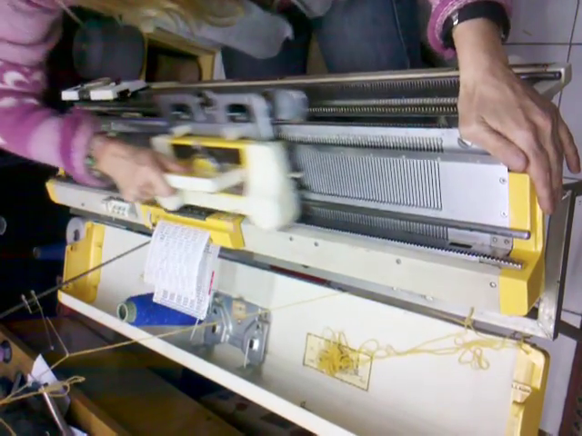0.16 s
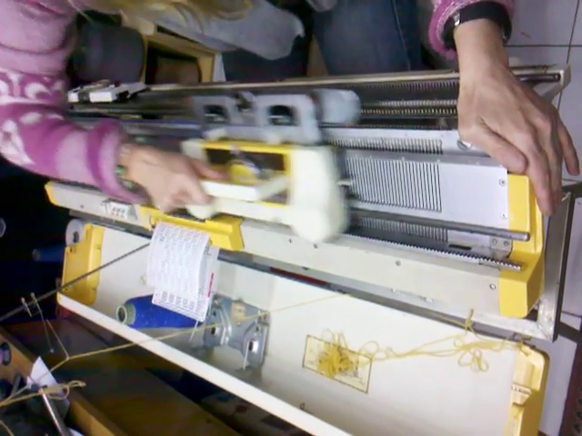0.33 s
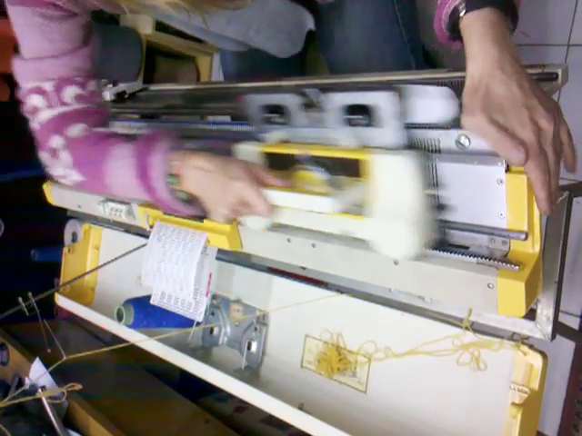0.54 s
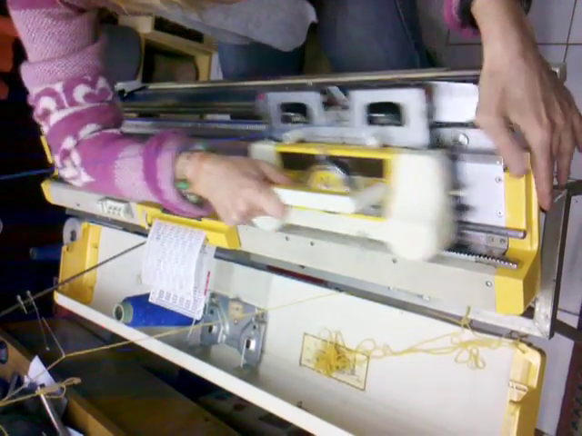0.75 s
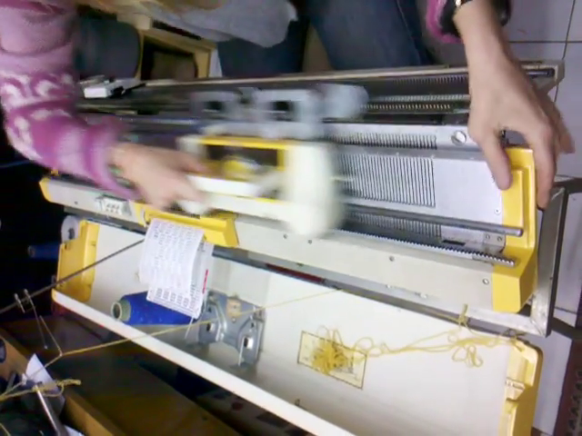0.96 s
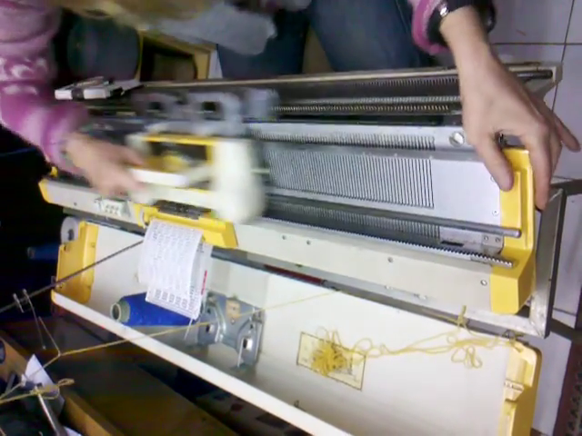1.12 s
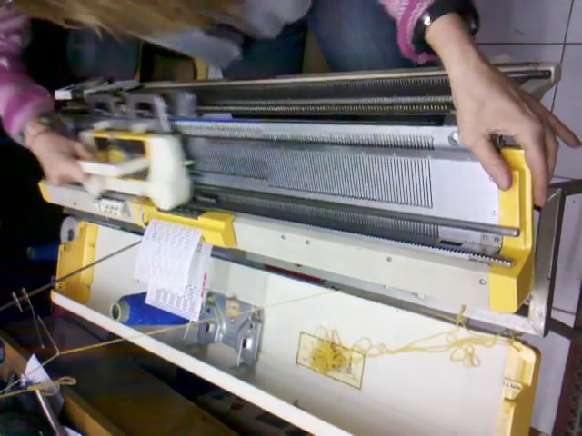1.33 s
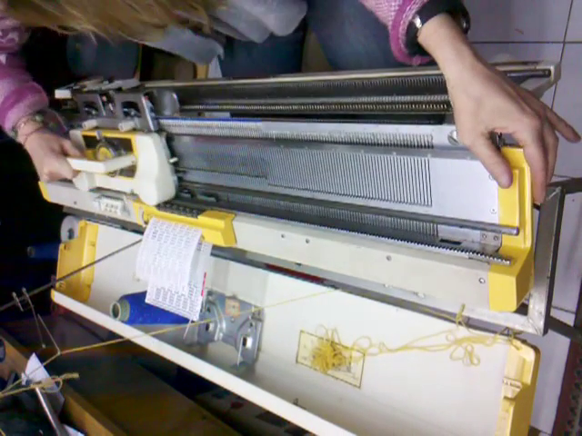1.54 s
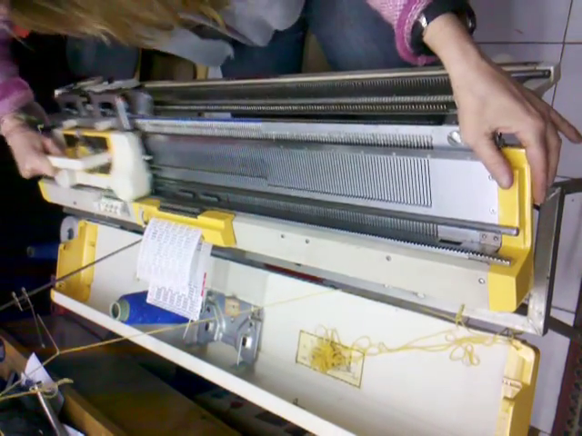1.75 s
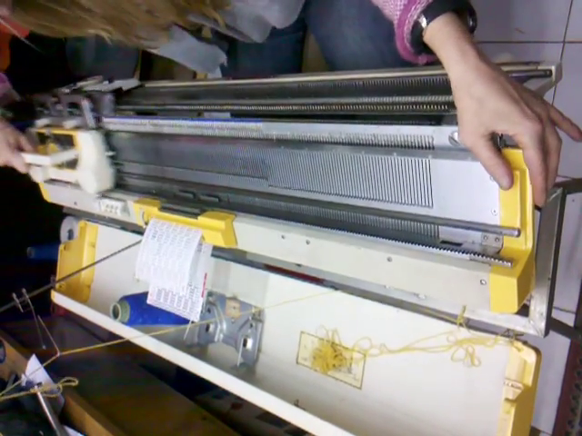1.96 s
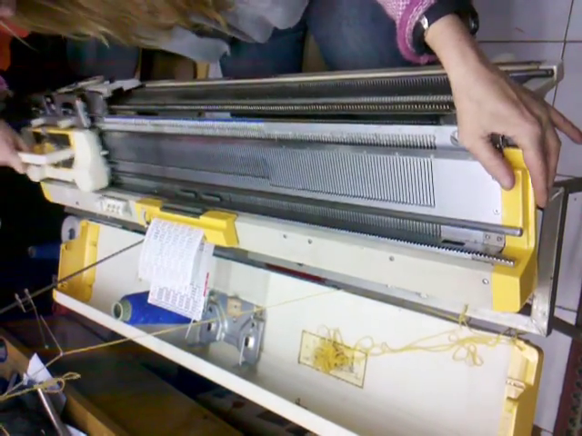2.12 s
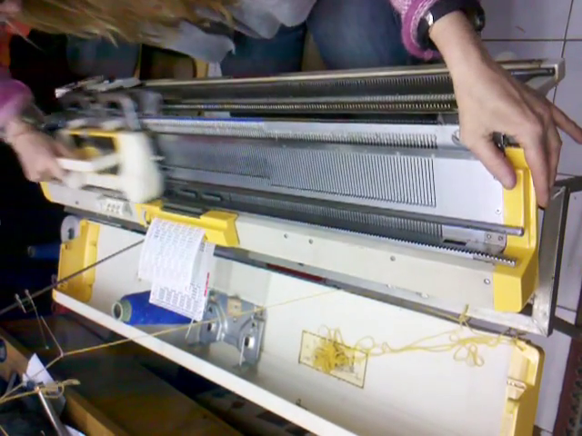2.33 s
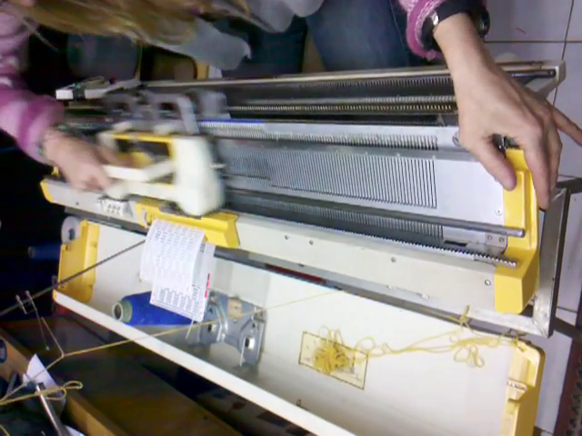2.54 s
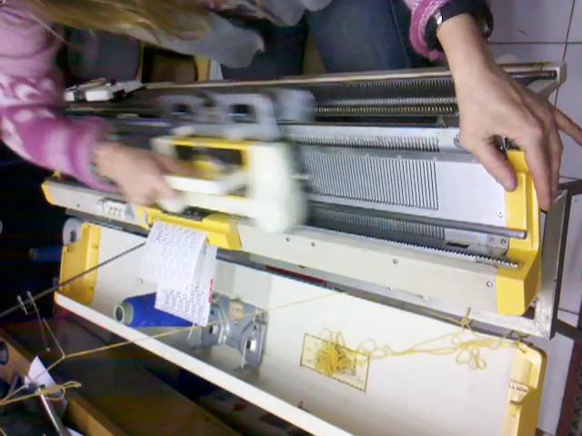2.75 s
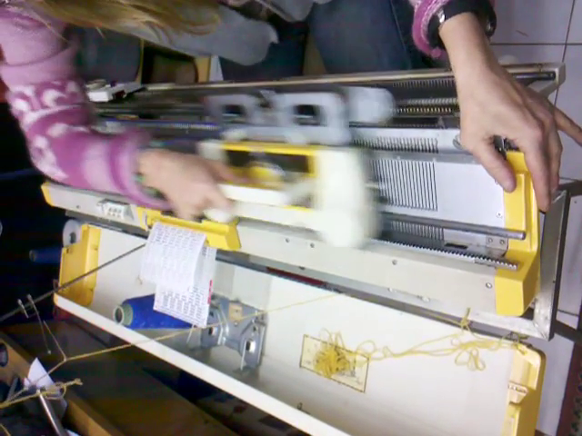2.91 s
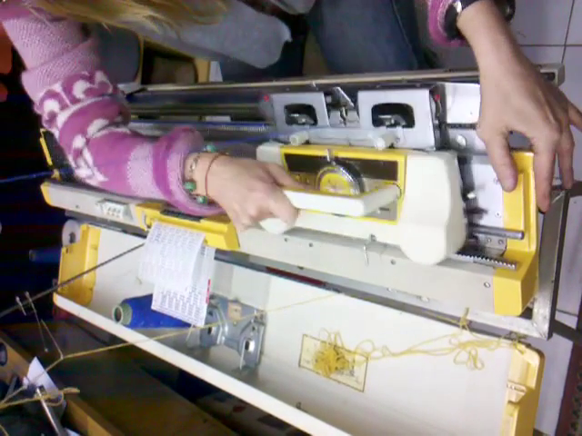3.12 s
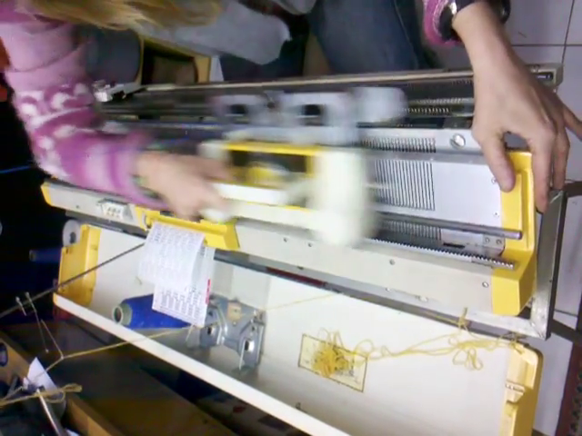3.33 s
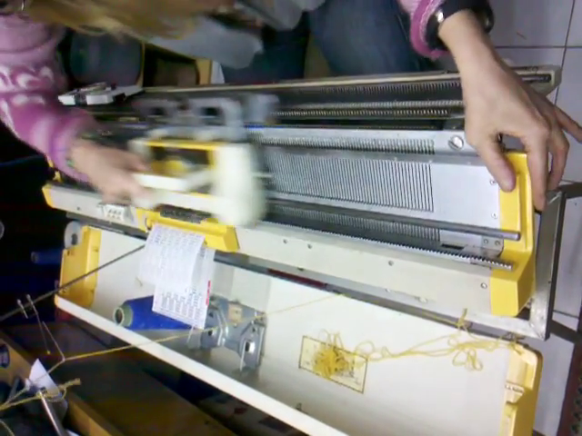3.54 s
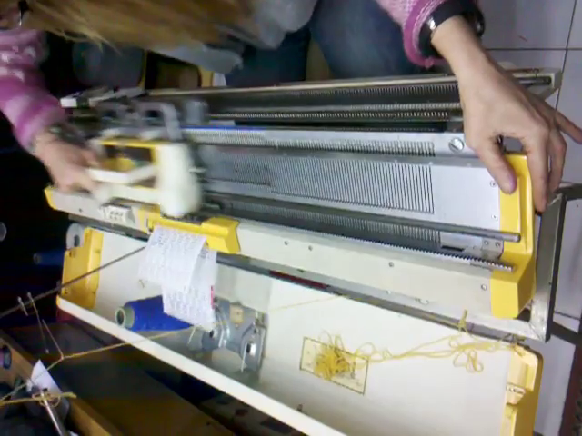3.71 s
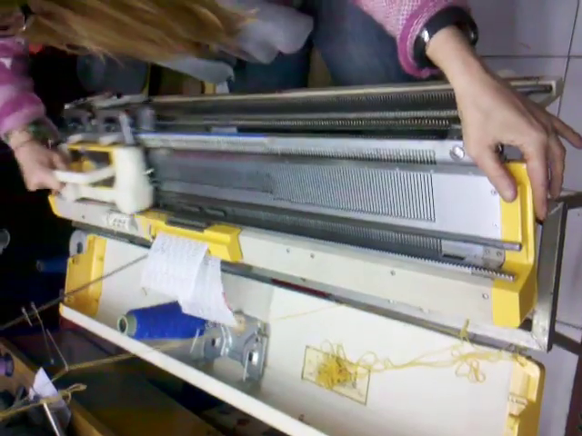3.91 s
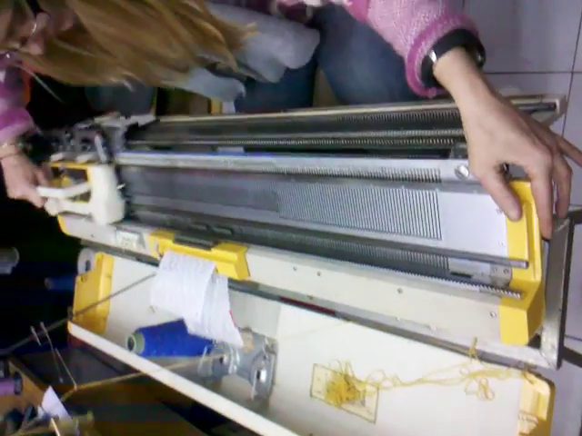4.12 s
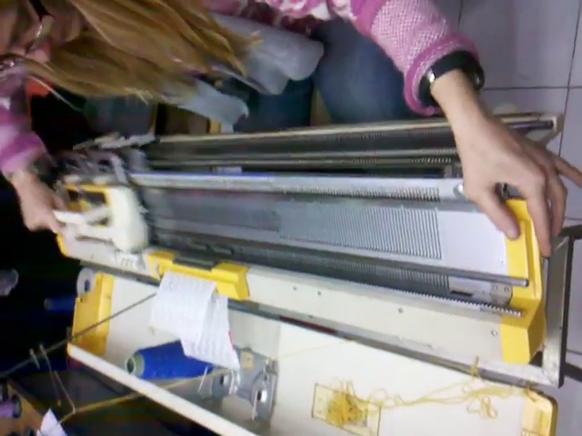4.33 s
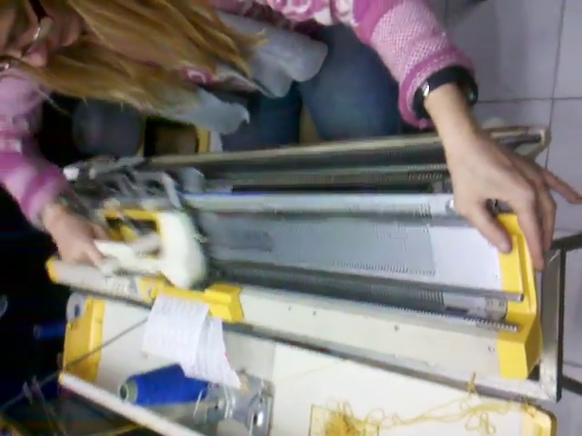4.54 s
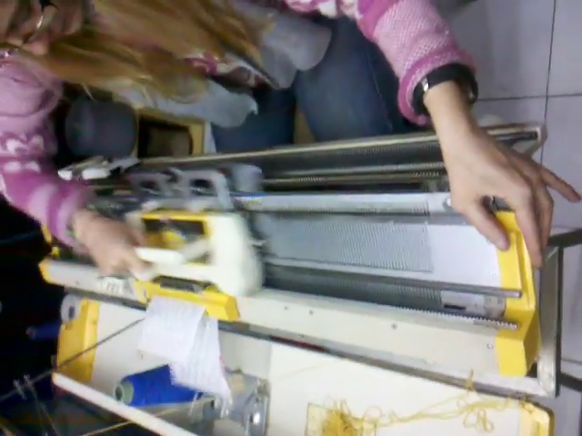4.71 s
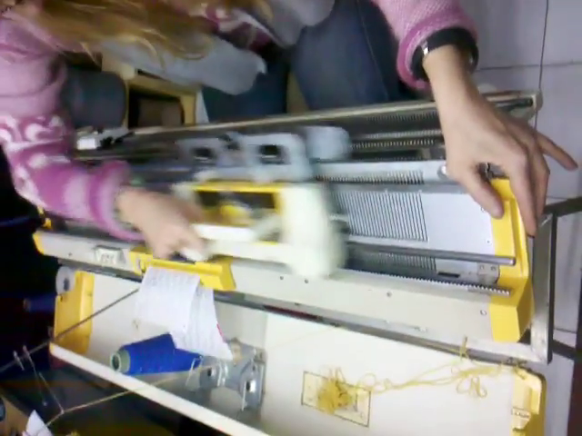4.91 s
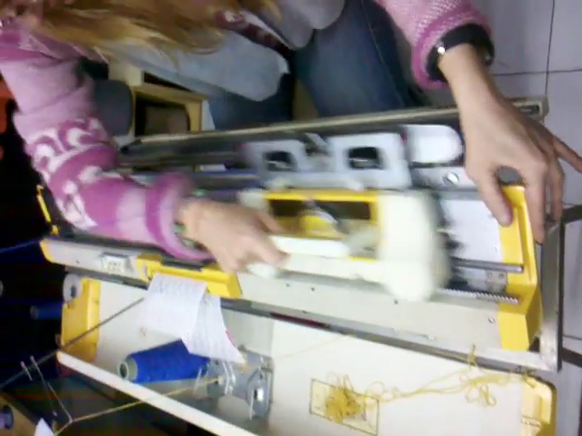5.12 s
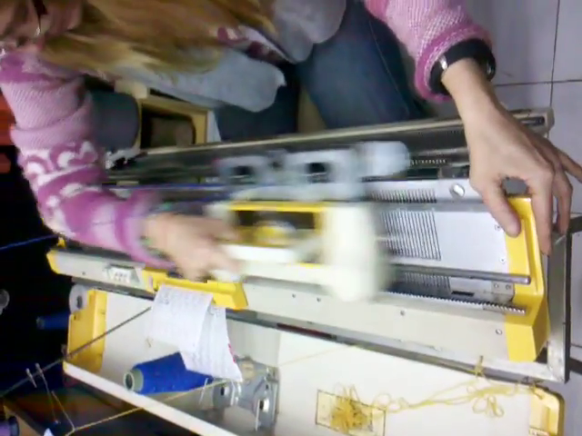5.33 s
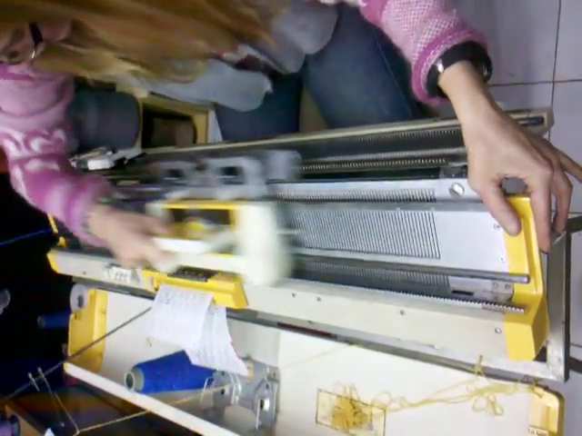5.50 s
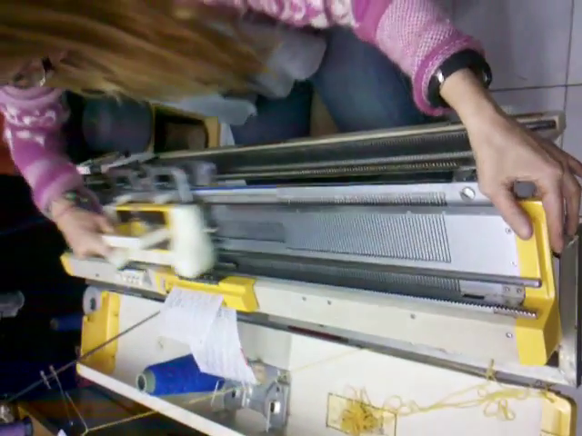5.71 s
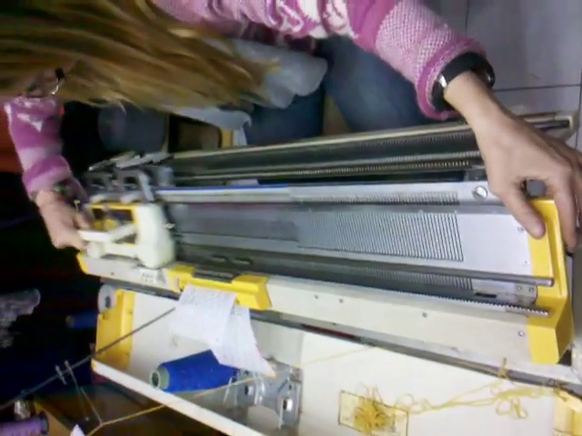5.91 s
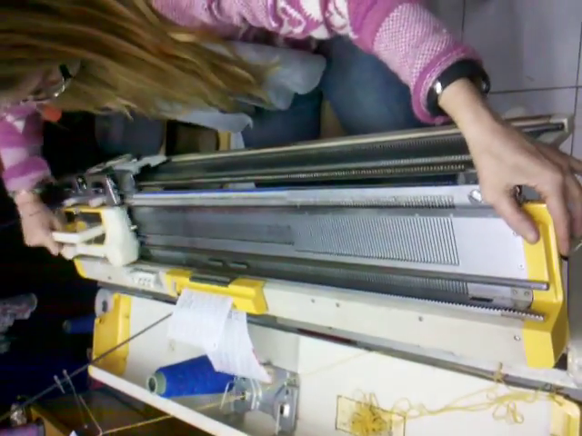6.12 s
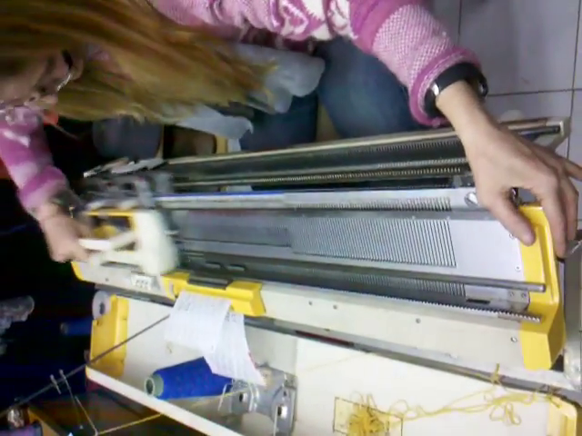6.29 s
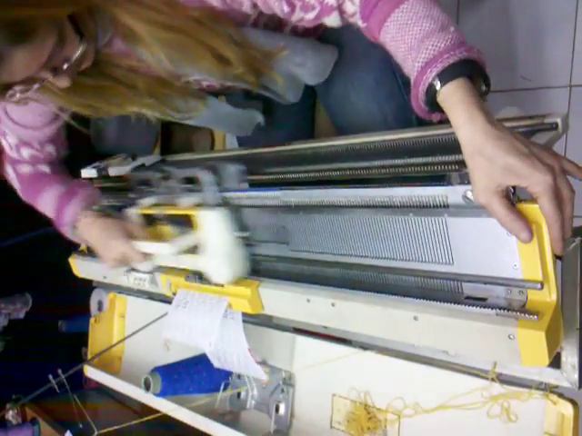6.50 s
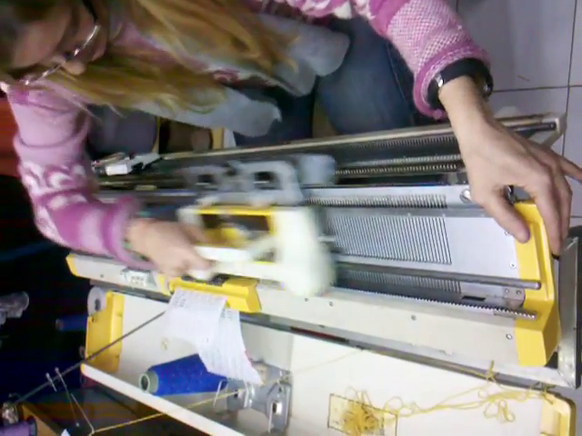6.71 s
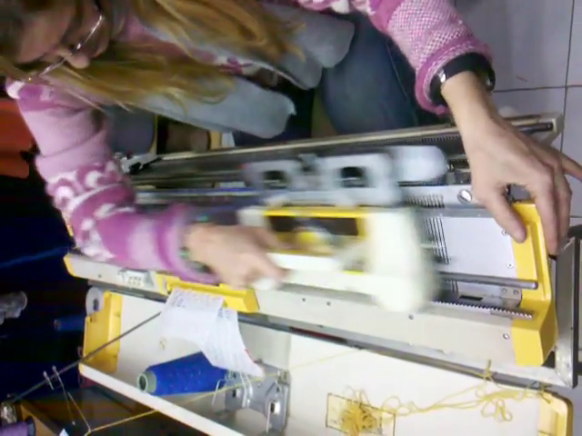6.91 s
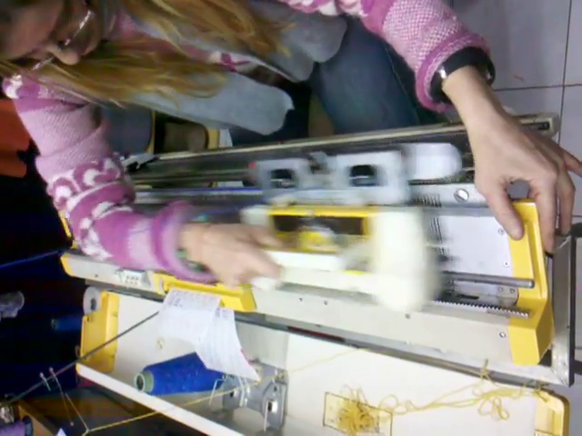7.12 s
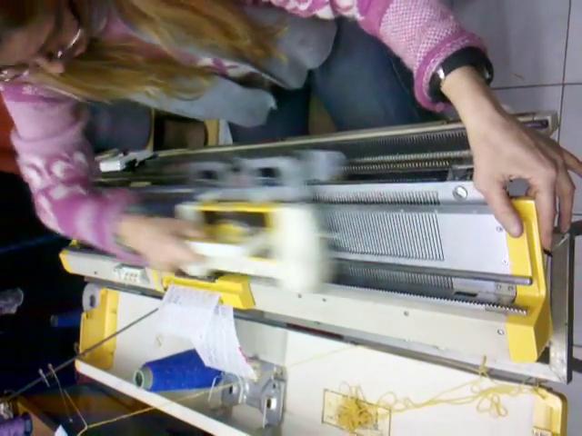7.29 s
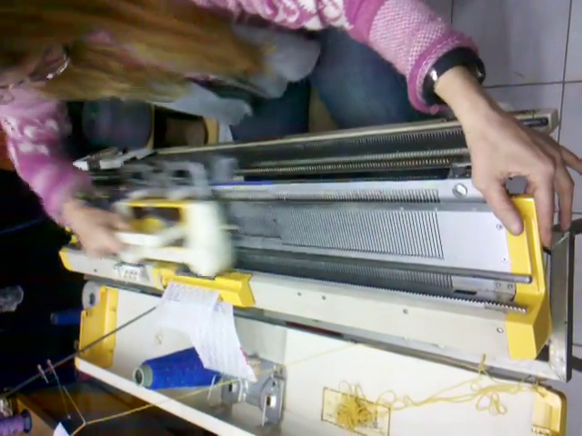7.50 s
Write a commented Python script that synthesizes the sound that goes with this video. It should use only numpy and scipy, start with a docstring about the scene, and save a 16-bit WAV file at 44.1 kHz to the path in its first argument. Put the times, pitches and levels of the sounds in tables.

```python
"""A small room, where a knitting machine's carriage is pushed to and fro by hand, close to two microphone ports.
Juddering sliders ring the case and toothed-wheel hums glide: the carriage rumbles and whirrs on its rail.
Cams scrape along the bed and set steel needles and latches ticking, as bursts of noise through resonances.
Levers clack and a sprung pawl snaps, as brief noise pulses; dull decaying blows bump the carriage on its rail."""
import sys
import numpy as np
from scipy import signal
from scipy.fft import rfft, irfft, next_fast_len
from scipy.io import wavfile
from scipy.ndimage import uniform_filter1d, map_coordinates

SR = 44100
rng = np.random.default_rng(int(sys.argv[2]) if len(sys.argv) > 2 else 0)


def unload_wav(signal):
    """Save mono or channel-first audio to the path in sys.argv[1] as 16-bit WAV at rate SR, clipped to [-1, 1]."""
    wavfile.write(
        sys.argv[1],
        SR,
        np.round(np.clip(np.atleast_2d(signal).T, -1, 1) * 32767).astype(np.int16),
    )


N = 332955  # length [samples]

# All levels are relative: the mix, the ports and the band limits still act on them.
# Colour of the still room: (frequency [Hz], density [dB per Hz])
STILL_SPECTRUM = [(25, -8), (55, -16), (90, -22), (160, -1), (550, -0.5), (1100, -27), (3000, -8),
                  (6000, -26), (14000, -33)]
# Colour of the deep rumble: (frequency [Hz], density [dB per Hz])
DEEP_SPECTRUM = [(25, -2.5), (55, 0), (90, -6.5), (150, -8), (220, -14), (330, -52)]
# Course of the deep rumble: (time [s], level [dB])
DEEP_LEVEL = [(0, -46), (1.04, -48), (1.12, -61), (7.55, -70)]
DEEP_SWING_DB = 5.5

# Shoves of the hand: (start [s], end [s], rumble level [dB], tiring over the shove [dB],
# time to get going [s], time to stop [s])
SHOVES = [(-.196, 0.742, -38, 1.5, 0.077, 0.063), (0.777, 1.558, -27.5, 18.5, 0.21, 0.29),
          (1.432, 2.133, -47.5, -13.5, 0.62, 0.23), (2.158, 3.168, -38.5, 0, 0.095, 0.037),
          (3.222, 4.228, -32.5, 16, 0.14, 0.035), (4.278, 5.259, -35.5, 6.5, 0.11, 0.066),
          (5.261, 6.185, -33, 13, 0.12, 0.054), (6.207, 7.097, -36, 4.5, 0.084, 0.05),
          (7.111, 7.994, -33.5, 8.5, 0.15, 0.09)]
# Cams running through needles at work: (meet [s], leave [s], rattle level [dB], swell time [s], fading [dB/s])
NEEDLE_PASSES = [(-0.01, 0.491, -20.5, 0.043, 10), (0.936, 1.378, -18.5, 0.11, 19),
                 (1.55, 1.69, -40, 0.13, 0), (1.698, 1.847, -28.5, 0.099, 5),
                 (2.303, 2.964, -20, 0.066, 3.5), (3.379, 4, -17.5, 0.1, 20.5),
                 (4.407, 5.017, -19, 0.076, 7), (5.393, 5.985, -18, 0.093, 16.5),
                 (6.316, 6.884, -18.5, 0.04, 7), (7.254, 7.9, -17, 0.1, 25)]
REST_DB, SHIVER_DB = -63.5, -58.5  # floors of the rail's rumble and of the needles' rattle
MEET_DB_PER_S, LEAVE_DB_PER_S = 850, 213  # slopes of the rattle's onset and release
SWELL_DB = 6  # growth of the rattle after its onset
IDLE_DB, IDLE_POWER = -44, 1.2  # idle needles at top speed; exponent of the speed
SPEED_DB = 6.5  # working needles at top speed over those at a crawl

# Resonances of the bed and its case: (frequency [Hz], width [Hz], level [dB])
CASE_MODES = [(196, 46, -8.5), (352, 15.5, -2.5), (428.5, 24.4, -2), (506.4, 20, -11), (533.5, 18, -5.5),
              (628, 42, 2), (675, 24, -2.5), (717.4, 24, 4), (799, 27, -2), (839, 30, -3), (1081, 22, 0.5)]
# Resonances of the lever and the carriage's frame: (frequency [Hz], width [Hz], level [dB])
FRAME_MODES = [(715.6, 15.3, 4.5), (1280, 68, 6.5), (1398, 43, 6.5), (1461, 63, 3.5), (1600, 27, 6),
               (1700, 59, 3.5), (1926, 117, 3.5), (2825, 284, 2.5), (3090, 72, 9), (3370, 34, 14.5),
               (3260, 87, -3.5), (3820, 96, 3.5), (4130, 40, -2.5)]
# Colour of the rail's rumble: (frequency [Hz], density [dB per Hz])
RAIL_SPECTRUM = [(30, -52), (60, -38), (85, -77), (170, -7.5), (280, -15.5), (360, -4.5), (650, -2.5),
                 (950, -2), (1300, -3), (2000, -10.5), (3000, -6.5), (5500, -26), (14000, -14.5)]
# Colour of the scraping cams: (frequency [Hz], density [dB per Hz])
CAM_SPECTRUM = [(300, -47), (800, -2.5), (1350, 4.5), (1800, -1.5), (2300, 2), (2800, 6), (3400, -14.5),
                (4150, 3), (4900, -6), (5600, -33), (7200, -1), (14000, -28)]
# Colour of needles and latches: (frequency [Hz], density [dB per Hz])
NEEDLE_SPECTRUM = [(800, -20.5), (2500, -21.5), (4000, -9), (5800, -13.5), (7100, -7), (8500, -4),
                   (9500, 1.5), (10400, 3.5), (11100, 2.5), (12000, 6), (13000, 3.5), (14000, -1.5)]
NEEDLE_SHARE = 0.58  # how far the cams follow the needles rather than the push (0-1)
CRAWL_DB, CRAWL_HZ = -4.5, 1060  # treble loss at a standstill, and the pitch above which it acts
BRIGHT_SPEED = 0.28  # speed (0-1) that opens up the treble
LOOSE_DB = -33  # single latches under a full rattle

# Knocks over levers and clicks in the carriage's play: (time [s], level [dB], swelling and dying time [s])
CLACKS = [(0.069, -23, 0.033), (0.452, -25.5, 0.013), (0.628, -33, .005), (0.766, -46, 0.0071),
          (0.885, -39, 0.0094), (1.001, -18.5, 0.0049), (1.211, -18, 0.032), (1.583, -43.5, .008),
          (1.929, -26.5, 0.006), (2.036, -51, 0.0021), (2.228, -40, .006), (2.678, -20, 0.025),
          (2.823, -32, 0.0027), (2.953, -21.5, 0.0039), (3.634, -19.5, 0.017), (4.06, -27, 0.0062),
          (4.168, -46, .008), (4.737, -21.5, 0.027), (5.009, -22, 0.0056), (5.19, -53, 0.0021),
          (5.225, -51, 0.0027), (5.248, -52, .003), (5.636, -17, 0.013), (5.871, -24, 0.0041),
          (6.033, -29, 0.011), (6.116, -39, 0.0034), (6.624, -19.5, 0.018), (6.881, -20, 0.0034),
          (7.135, -46, .005), (7.486, -18, 0.013)]
# Colour of the clatter: (frequency [Hz], density [dB per Hz])
KNOCK_SPECTRUM = [(200, -45), (700, 9.5), (1500, -6), (4000, 12.5), (5700, 2), (8000, 11), (11000, 19.5),
                  (14000, -8)]
# Wheel teeth meeting a case resonance: (time [s], pitch [Hz], level [dB], half length [s], glide [Hz/s])
HUMS = [(0.205, 192, -52, 0.16, 2), (.68, 188, -55, 0.12, -79.5), (.905, 326, -40, .03, 652),
        (.985, 350, -47, 0.052, -1), (0.992, 188, -50, .07, 192), (1.161, 410, -48, .04, 2),
        (1.87, 210, -54.5, 0.19, 0), (2.348, 628, -40.5, 0.048, -2), (2.36, 198, -58, .08, -150),
        (3.06, 343, -45.5, 0.043, -250), (3.334, 338, -44.5, 0.031, 700), (3.453, 424, -44, .045, 49),
        (3.549, 402, -48.5, 0.039, -400), (4.11, 325, -55, .039, -300), (5.461, 429, -37, 0.055, 8),
        (5.648, 352, -50.5, .035, -100), (6.073, 353, -41, 0.03, -200), (6.965, 341, -43, 0.034, -400),
        (7.217, 350, -49, .04, 404)]
WAVER, HUM_DB = 0.011, 2.8  # pitch unsteadiness (fraction); gain on all the hums
# Snaps of the pawl, with a few latch ticks near 3.9 s: (time [s], level [dB])
SNAPS = [(0.5493, -14), (0.811, -39), (1.941, -22), (3.032, -18), (3.8564, -30), (3.875, -21),
         (3.9579, -19), (4.07, -23.5), (4.078, -28), (4.3278, -39), (5.09, -18), (5.099, -30),
         (5.2915, -40), (6.25, -32.5), (6.952, -18.5), (7.16, -36)]
# Colour of the pawl: (frequency [Hz], density [dB per Hz])
PAWL_SPECTRUM = [(300, -4), (1200, -7), (3000, 5.5), (4500, 4), (5600, -13.5), (7300, 8.5), (8500, 2.5),
                 (10000, 7.5), (12000, 18.5), (14000, -1)]
# Carriage taking up its play on the rail: (time [s], level [dB])
BUMPS = [(.807, -30), (0.849, -25), (2.29, -27), (2.681, -29), (3.44, -23.5), (4.068, -29), (4.74, -24.5),
         (5.29, -38), (6.055, -32.5), (6.221, -42), (7.182, -32), (7.485, -44)]
BUMP_T60_S = 0.12

# Decay of the room: (frequency [Hz], time to fall by 60 dB [s])
ROOM_T60 = [(200, 0.26), (2000, 0.078), (12000, 0.16)]
# Likeness of the two ports: (frequency [Hz], coherence [0-1])
PORT_LIKENESS = [(100, .9), (300, .9), (450, .8), (550, .35), (640, .9), (1500, .94), (1900, .78),
                 (2150, .12), (2500, .5), (3000, .76), (3300, .94), (3500, .99), (3750, .93), (3950, .52),
                 (4200, .58), (4400, .42), (5500, .06), (6700, .45), (7300, .18), (9000, .33), (11000, .22),
                 (13500, .42)]
# Phase between the ports: (frequency [Hz], left lead [rad])
PORT_LEAD = [(60, 2.6), (180, 1.4), (470, 1.2), (590, 0), (1900, -.45), (2300, 1.3), (3000, 2.2), (3280, 3),
             (3720, 3.2), (4000, 4.3), (4500, 5.1), (6600, 6.1), (8200, 3.1), (9600, 0), (11000, -3.1),
             (13800, -9.4)]
# Balance of the ports: (frequency [Hz], left minus right [dB])
PORT_BALANCE = [(120, -1), (280, -1), (450, 3), (650, 3), (1000, 5.2), (1300, .5), (1750, -1), (2050, -3),
                (2600, -.8), (3400, 0), (5200, -1.5), (6300, -.3), (12000, -.6)]
LOW_CUT_HZ, TOP_HZ = 215, 13950


def amp(db):
    """Decibel law: 20 dB is a factor of ten in amplitude."""
    return 10 ** (np.asarray(db) / 20)


def unit(x):
    """Normalisation: x at rms 1."""
    return x / np.sqrt(np.mean(x ** 2) + 1e-20)


def along(points, hz):
    """Logarithmic pitch scale: (frequency, value) points joined on a log axis."""
    f, value = np.transpose(points)
    return np.interp(np.log(hz + 1), np.log(f + 1), value)


def wobble(rate):
    """Band-limited randomness: a smooth random curve with rate knots a second."""
    knots = rng.standard_normal(int(N * rate / SR) + 4)
    return map_coordinates(knots, [np.arange(N) * rate / SR])


def filtered(x, response):
    """Linear filtering: the spectrum of x times a response of frequency."""
    m = next_fast_len(N + SR // 2)
    hz = np.fft.rfftfreq(m, 1 / SR)
    return irfft(rfft(x, m) * response(hz), m)[..., :N]


def coloured(x, spectrum):
    """Spectral shaping: x with a broad colour, at rms 1."""
    return unit(filtered(x, lambda hz: amp(along(spectrum, hz))))


def rung(x, modes):
    """Modal resonance: x through a sum of damped resonators of alternating sign, at rms 1."""
    def response(f):
        total = 0
        for k, (centre, width, db) in enumerate(modes):
            damping = 1j * f * width
            total = total + (-1) ** k * amp(db) * damping / (centre ** 2 - f ** 2 + damping)
        return total
    return unit(filtered(x, response))


def ticks(rate, scatter_db, life):
    """Shot noise: random contacts, rate a second, as decaying bursts of uneven size (life [s]); two views."""
    contacts = rng.random(N) < rate / SR
    sizes = contacts * amp(scatter_db * np.clip(rng.standard_normal(N), -2, 2))
    energy = signal.lfilter([1], [1, -np.exp(-2 / (life * SR))], sizes ** 2 / rate)
    return unit(np.sqrt(np.abs(energy)) * rng.standard_normal((2, N)))


def patchy(x, depth_db):
    """Spectral fluctuation: the colour of x drifts at random, some 700 Hz by 100 ms at a time, at rms 1."""
    z = signal.stft(x, nperseg=512)[2]
    field = rng.standard_normal(z.shape[1:])
    field = uniform_filter1d(field, size=8, axis=0)
    field = uniform_filter1d(field, size=18, axis=1)
    return unit(signal.istft(z * amp(depth_db * unit(field)), nperseg=512)[1][:, :N])


def background():
    """Stationary and modulated noise: the quiet room, and an uneven deep rumble that drops after a second."""
    still = amp(-56.5) * coloured(rng.standard_normal((2, N)), STILL_SPECTRUM)
    deep_db = np.interp(np.arange(N) / SR, *np.transpose(DEEP_LEVEL)) + DEEP_SWING_DB * wobble(rate=13)
    return still + amp(deep_db) * coloured(rng.standard_normal((2, N)), DEEP_SPECTRUM)


def carriage():
    """Driven motion: each shove gets going, tires and stops; gives speed (0-1) and rail rumble [dB]."""
    t = np.arange(N) / SR
    speed, power = np.zeros((2, N))
    for start, end, db, tiring_db, going_s, stop_s in SHOVES:
        duration = end - start
        u = np.clip((t - start) / duration, 0, 1)
        moving = np.tanh(u * duration / going_s) * np.tanh((1 - u) * duration / stop_s)
        power += (amp(db - tiring_db * u) * moving) ** 2
        speed += np.abs(np.sin(np.pi * u))
    return speed, 10 * np.log10(power + amp(REST_DB) ** 2)


def rattle(speed):
    """Addition of powers [dB]: idle needles stir with speed; working ones set in, swell, fade and drop out."""
    t = np.arange(N) / SR
    power = amp(SHIVER_DB) ** 2 + (amp(IDLE_DB) * speed ** IDLE_POWER) ** 2
    for meet, leave, db, swell_s, fade_db_per_s in NEEDLE_PASSES:
        yet_to_swell_db = SWELL_DB * np.clip(1 - (t - meet) / swell_s, 0, 1)
        faded_db = fade_db_per_s * np.maximum(t - meet - swell_s, 0)
        edges_db = MEET_DB_PER_S * np.maximum(meet - t, 0) + LEAVE_DB_PER_S * np.maximum(t - leave, 0)
        power += amp(db - yet_to_swell_db - faded_db - edges_db + SPEED_DB * (speed - 1)) ** 2
    return 10 * np.log10(power)


def rail(rail_db):
    """Friction-driven resonance: sliders judder on the rail and drive each case mode now more, now less."""
    judder = ticks(rate=1500, scatter_db=1.5, life=0.00081)
    case = np.zeros((2, N))
    for hz, width, db in CASE_MODES:
        drive = amp(db + 1.1 * wobble(rate=6.5)) * np.sqrt(width)
        case += drive * rung(judder, [(hz, width, 0)])
    rumble = coloured(ticks(rate=1400, scatter_db=2.8, life=0.0016), RAIL_SPECTRUM)
    return amp(rail_db - 2.0) * unit(case) + amp(rail_db - 1.0) * rumble


def cams(rail_db, needle_db):
    """Impact excitation: needle butts hit the cams and ring the frame, growing with push and needles at work."""
    level_db = NEEDLE_SHARE * needle_db + (1 - NEEDLE_SHARE) * rail_db
    scrape = patchy(coloured(ticks(rate=1500, scatter_db=0.0, life=0.0037), CAM_SPECTRUM), depth_db=2.0)
    ring = rung(ticks(rate=700, scatter_db=5.0, life=0.00052), FRAME_MODES)
    return amp(level_db - 7.0) * scrape + amp(level_db - 10.5) * ring


def brightening(x, speed):
    """Speed-dependent bandwidth: a crawling carriage grumbles; the treble opens up as it gathers speed."""
    dull = filtered(x, lambda hz: 1 / (1 + (hz / CRAWL_HZ) ** 4))
    treble_gain = amp(CRAWL_DB * np.exp(-(speed / BRIGHT_SPEED) ** 2))
    return dull + treble_gain * (x - dull)


def needles(needle_db):
    """Fusion of dense impacts: needle and latch ticks merge into a bright rush of drifting colour."""
    rush = coloured(ticks(rate=5600, scatter_db=3.0, life=0.0028), NEEDLE_SPECTRUM)
    flutter_db = 0.8 * wobble(rate=33)
    return amp(needle_db + flutter_db) * patchy(rush, depth_db=2.0)


def latches(needle_db):
    """Sparse impacts: here and there a loose latch flips with its own tick, following the rattle's level."""
    flips = coloured(ticks(rate=130, scatter_db=3.5, life=0.00041), NEEDLE_SPECTRUM)
    butts = coloured(ticks(rate=70, scatter_db=2.0, life=0.0011), CAM_SPECTRUM)
    return amp(LOOSE_DB + needle_db - needle_db.max()) * (flips + amp(-13.5) * butts)


def clacks():
    """Transient modal excitation: a knocked lever's clatter swells and dies in the frame's resonances."""
    t = np.arange(N) / SR
    force = sum(amp(db) * np.exp(-np.abs(t - s) / length) for s, db, length in CLACKS)
    ring = rung(force * ticks(rate=1400, scatter_db=2.5, life=0.0025), FRAME_MODES)
    clatter = coloured(force * ticks(rate=1100, scatter_db=11.5, life=0.0048), KNOCK_SPECTRUM)
    return np.std(force) * (amp(-4.5) * ring + amp(-3.0) * clatter)


def whirr():
    """Tooth-rate resonance: wheel teeth hum in unsteady swells, gliding as the carriage changes speed."""
    t, hum = np.arange(N) / SR, np.zeros(N)
    waver = 1 + WAVER * wobble(rate=60)
    for s, hz, db, length, glide in HUMS:
        near = np.abs(t - s) < 4 * length
        u = t[near] - s
        phase = 2 * np.pi * np.cumsum(waver[near] * (hz + glide * u)) / SR
        overtones = 0.2 * np.sin(2 * phase) + 0.2 * np.sin(3 * phase)
        hum[near] += amp(db) * np.exp(-(u / length) ** 2) * (np.sin(phase) + overtones)
    # only the first view, the part that both ports share
    return amp(HUM_DB + wobble(rate=40)) * np.array([hum, np.zeros(N)])


def snaps():
    """Impulsive release: the sprung pawl cracks for a few milliseconds and leaves the needles shivering."""
    force = np.zeros(N)
    for s, db in SNAPS:
        force[round(s * SR)] = amp(db)
    u = np.arange(SR // 8) / SR
    crack_shape = np.exp(-((u - 0.001) / 0.0015) ** 2)
    shiver_shape = amp(-22 - 60 * u / 0.09)  # falls by 60 dB in 90 ms
    crack = signal.fftconvolve(force, crack_shape + shiver_shape)[:N] * rng.standard_normal((2, N))
    return np.std(crack) * coloured(crack, PAWL_SPECTRUM)


def bumps():
    """Exponential decay: dull blows of the carriage on its rail ring the case and, faintly, the frame."""
    t = np.arange(N) / SR
    force = sum(amp(db - 60 * np.abs(t - s) / BUMP_T60_S) * (t >= s) for s, db in BUMPS)
    blow = force * rng.standard_normal((2, N))
    case = amp(-6.5) * rung(blow, CASE_MODES)
    thud = amp(-20) * coloured(blow, RAIL_SPECTRUM)
    frame = amp(-16) * rung(blow, FRAME_MODES)
    return np.std(blow) * (case + thud + frame)


def room(x):
    """Diffuse reverberation: decaying noise, redrawn 14 times a second to stand for the carriage's moving."""
    wet, hop = np.zeros((2, N + SR)), SR // 14
    for start in range(0, N, hop):
        hz, t, z = signal.stft(rng.standard_normal((2, SR // 3)), fs=SR, nperseg=256)
        decay = amp(-60 * t / along(ROOM_T60, hz)[:, None])
        tail = signal.istft(z * decay, fs=SR, nperseg=256)[1]
        answer = signal.fftconvolve(x[:, start:start + hop], tail / np.linalg.norm(tail[0]), axes=1)
        wet[:, start:start + answer.shape[1]] += answer
    return wet[:, :N]


def ports(pair):
    """Interaural-style coherence: two ports hear a shared part with a phase between them, and one that differs."""
    def mix(hz):
        turn = np.arccos(np.clip(along(PORT_LIKENESS, hz), 0, 1)) / 2
        return np.array([np.cos(turn), np.sin(turn)])

    def sides(hz):
        left = amp(along(PORT_BALANCE, hz) / 2) * np.exp(0.5j * along(PORT_LEAD, hz))
        return np.array([left, 1 / left])

    shared, apart = filtered(pair, mix)
    return filtered(np.array([shared + apart, shared - apart]), sides)


def scene():
    """Superposition: machine, pawl, room answer and background add at the two ports; the pawl is drier."""
    speed, rail_db = carriage()
    needle_db = rattle(speed)
    sliding = brightening(rail(rail_db) + cams(rail_db, needle_db), speed)
    ticking = needles(needle_db) + latches(needle_db)
    machine = sliding + ticking + whirr() + bumps() + clacks()
    pawl = snaps()
    into_room = machine + amp(-3) * pawl
    return ports(machine + pawl + amp(-4.5) * room(into_room) + background())


def record(dry):
    """Band limitation: the deep bass is thinned and the treble ends steeply at the upper limit."""
    thinned = filtered(dry, lambda hz: hz ** 2 / np.sqrt(hz ** 4 + LOW_CUT_HZ ** 4))
    return filtered(thinned, lambda hz: 1 / (1 + (hz / TOP_HZ) ** 400))


dry = scene()
out = record(dry)
unload_wav(out)
```